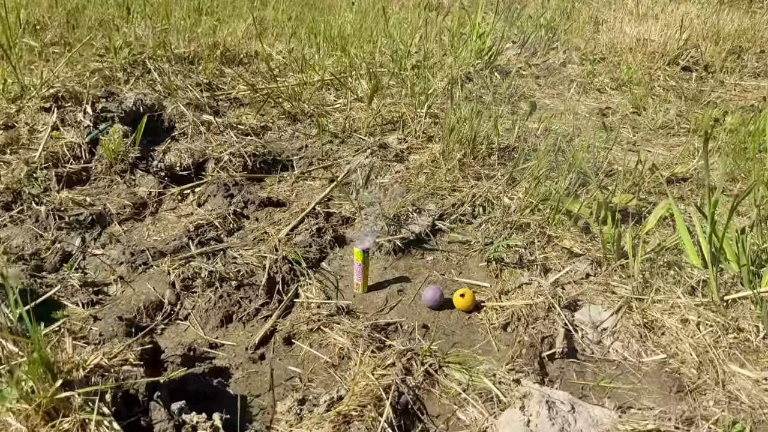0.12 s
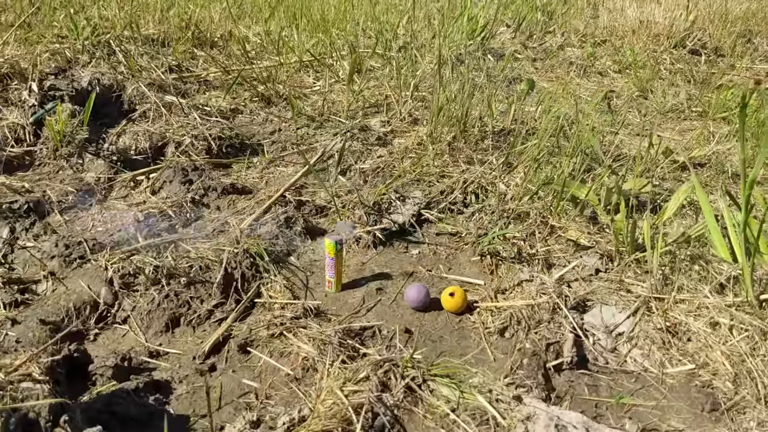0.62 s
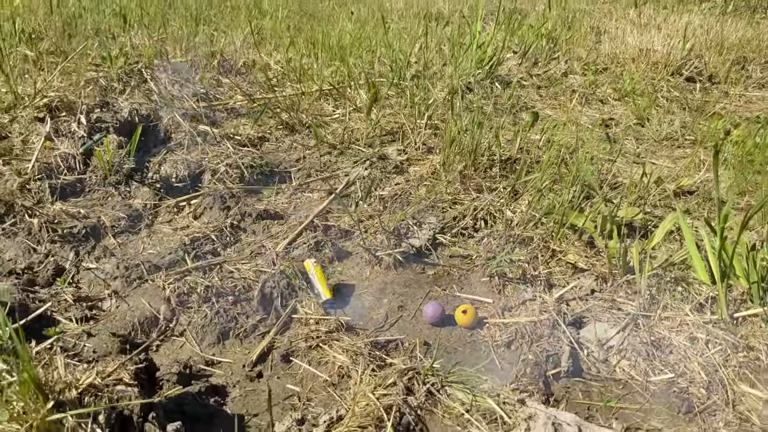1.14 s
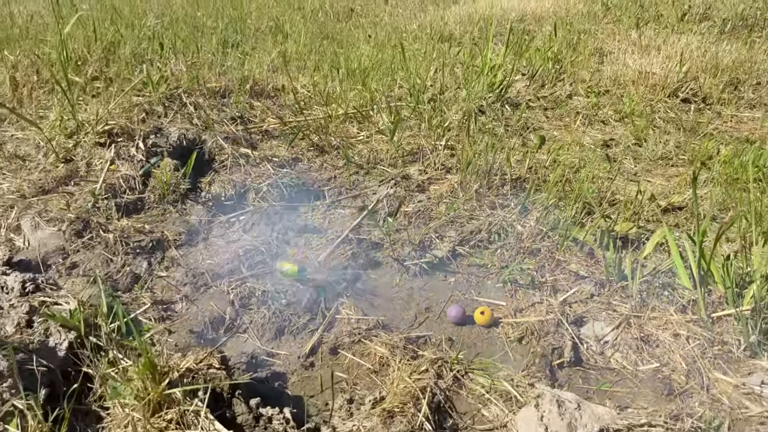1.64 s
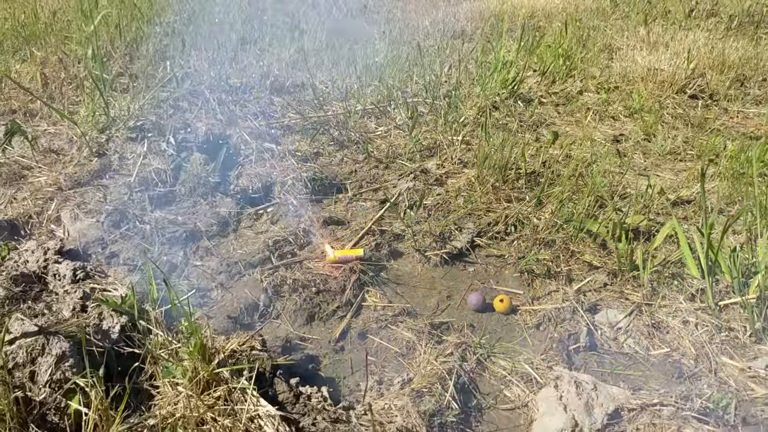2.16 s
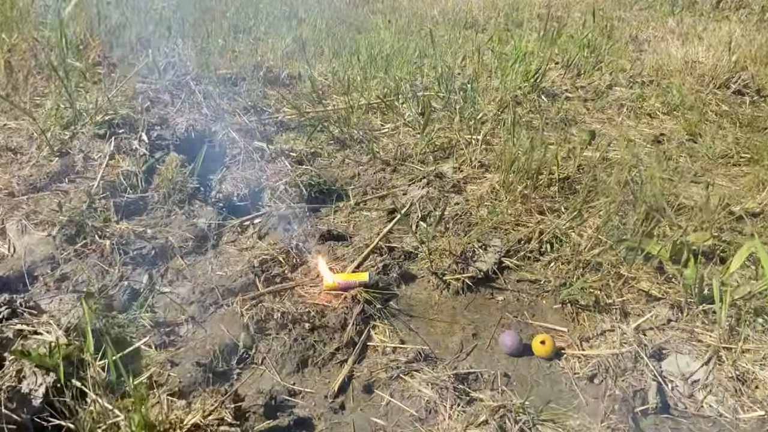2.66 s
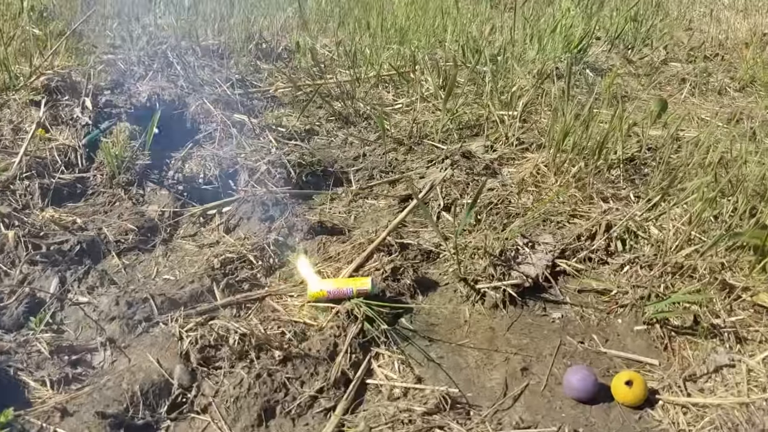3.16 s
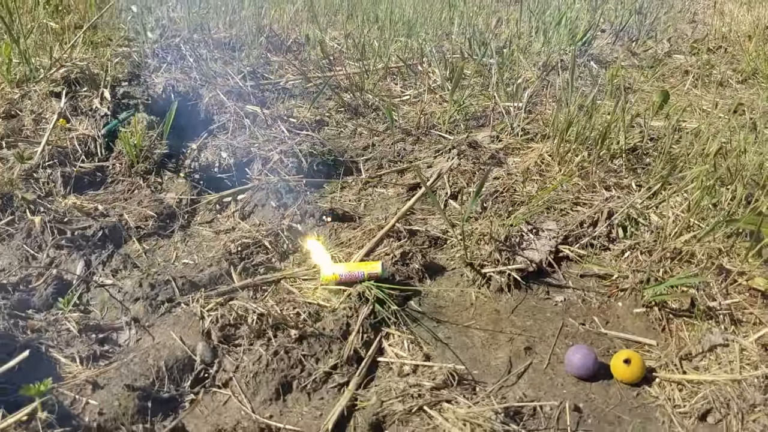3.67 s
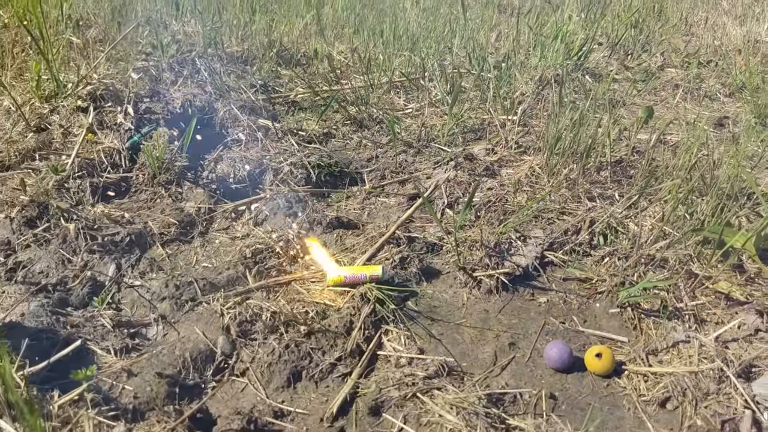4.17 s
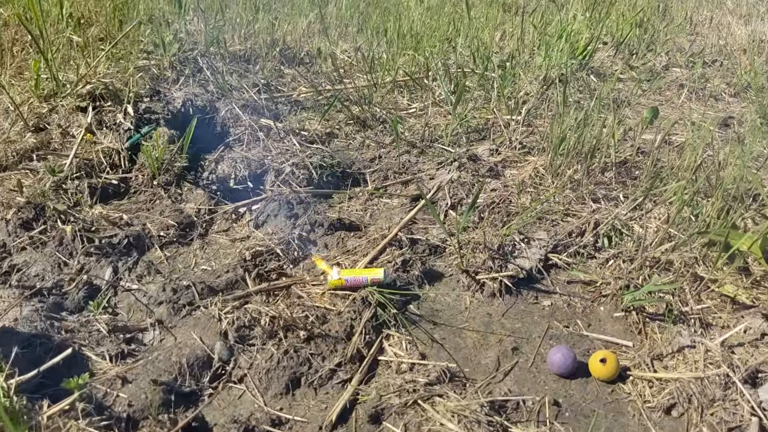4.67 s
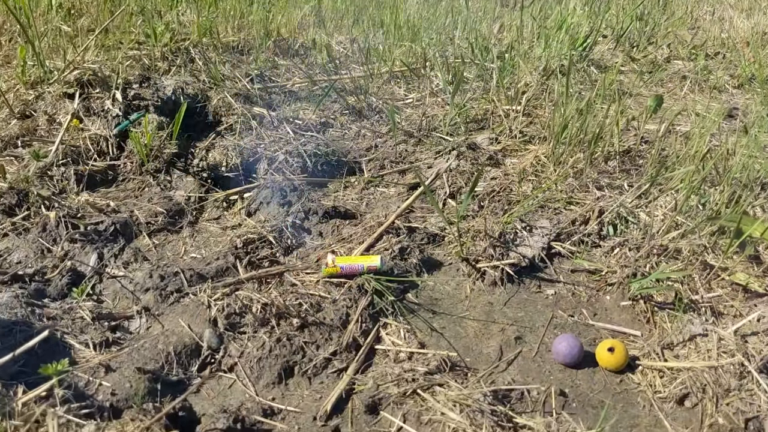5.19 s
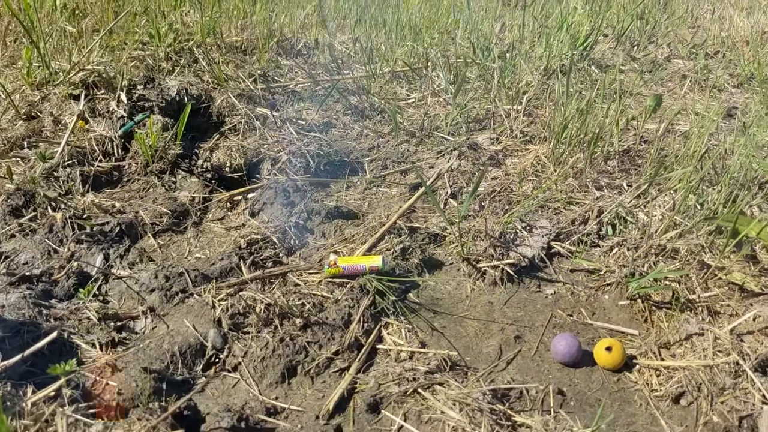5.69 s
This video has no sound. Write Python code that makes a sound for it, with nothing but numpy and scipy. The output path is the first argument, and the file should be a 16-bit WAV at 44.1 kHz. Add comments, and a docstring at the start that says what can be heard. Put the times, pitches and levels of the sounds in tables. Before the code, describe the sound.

Faint birds, then a sudden whirring jet of sparks that settles into a harsh bright hiss, pops sharply and coughs away in an open field.

```python
"""A small paper-tube firework spins on bare soil in a field, then lies still, hisses, pops and sputters out.
Its jet is banded noise with swinging colour; its pops and ticks are clicks ringing the short tube.
Two far birds and one short whistle are wavering near-sines blurred by echoes, over a faint rustle of
grass and air in shaped noise. Wind, as low breeze noise and lumpy gusts, buffets the two microphone
ports of a hand-held camera."""
import sys
import numpy as np
from scipy import signal
from scipy.io import wavfile
from scipy.ndimage import uniform_filter1d, map_coordinates

SR = 44100
rng = np.random.default_rng(int(sys.argv[2]) if len(sys.argv) > 2 else 0)


def amplitude_ratio(level_db):
    """Convert a level in decibels to the matching linear amplitude (field) ratio."""
    exponent = np.asarray(level_db, float) / 20
    return 10 ** exponent


def int16_out(signal):
    """Quantize to a 16-bit WAV file."""
    q = np.round(np.clip(np.atleast_2d(signal).T, -1, 1) * 32767)
    wavfile.write(sys.argv[1], SR, q.astype(np.int16))


N = 256567   # samples


def rms_one(x):
    """Scales a signal to an rms of 1."""
    return x / np.sqrt(np.mean(x ** 2) + 1e-20)


def in_time(rows):
    """Draws each column of a table as a curve over the scene; the first column is seconds."""
    s, *columns = np.transpose(rows)
    return [np.interp(np.arange(N) / SR, s, c) for c in columns]


def fade_in(from_to_s):
    """Straight rise from 0 to 1 between two moments."""
    return np.interp(np.arange(N) / SR, from_to_s, [0, 1])


def at_hz(points, hz):
    """Reads a spectrum table at one frequency, along a log frequency axis."""
    table_hz, db = np.transpose(points)
    return np.interp(np.log(hz), np.log(table_hz), db)


def drift(rate_hz):
    """Slow chance of spread 1: sparse noise twice through a one-pole low-pass."""
    step = 40   # samples between draws
    r = np.exp(-2 * np.pi * step * rate_hz / SR)
    draws = rng.standard_normal(N // step + 2002)
    slow = signal.lfilter([1], [1, -2 * r, r * r], draws)[2000:]
    return np.interp(np.arange(N) / step, np.arange(len(slow)), rms_one(slow))


def bumps(rows, width_s):
    """Each row is a brief bell-shaped swell or dip, width_s its standard deviation; one curve per column."""
    s, *columns = np.transpose(rows)
    coarse = np.arange(0, N, 32)
    shape = np.exp(-.5 * ((coarse[:, None] / SR - s) / width_s) ** 2)
    return np.array([np.interp(np.arange(N), coarse, shape @ c) for c in columns])


def band_pass(x, low_hz, high_hz):
    """Second-order Butterworth band-pass."""
    return signal.sosfilt(signal.butter(2, [low_hz, high_hz], "band", fs=SR, output="sos"), x)


def bands(white):
    """Splits noise into third-octave bands; neighbours come from unrelated noise."""
    edges = np.minimum(90 * 2 ** np.arange(0, 8, 1 / 3), 19000)
    for k, (low, high) in enumerate(zip(edges, edges[1:])):
        yield np.sqrt(low * high), band_pass(white[k % 2], low, high)


def resonances(x, peaks):
    """A chain of peaking filters, each lifting or cutting around one frequency."""
    for hz, width_hz, db in peaks:
        w, g, a = 2 * np.pi * hz / SR, amplitude_ratio(db / 2), np.pi * width_hz / SR
        turn = -2 * np.cos(w)
        x = signal.lfilter([1 + a * g, turn, 1 - a * g], [1 + a / g, turn, 1 - a / g], x)
    return x


def late(x, lag_ms):
    """Delays a signal by a lag that may move, reading between samples."""
    return map_coordinates(x, [np.arange(N) - lag_ms * SR / 1000], order=3, mode="nearest")


def pan(db):
    """Left and right gains for a left-right difference in dB; positive is louder on the left."""
    return amplitude_ratio(np.reshape([db / 2, -db / 2], (2, -1)))


# Colour of the far rustle. Each row: frequency in Hz, relative level in dB per Hz.
FIELD_COLOUR = [(150, -40), (250, -10), (1460, -11), (2240, -5.5), (3390, -10), (3960, 1), (5040, -17),
                (7250, -7.5), (10100, -13.5), (12800, -13), (15500, -18)]


def field():
    """Far rustle of grass and air: shaped noise, all but unrelated between the ports."""
    white = rng.standard_normal((2, 2, N))
    white = white + 0.02 * white[:, ::-1]
    rustle = sum(amplitude_ratio(at_hz(FIELD_COLOUR, hz)) * band for hz, band in bands(white))
    return amplitude_ratio(-53) * rms_one(rustle)


# Steady breeze on the ports. Each row: time in seconds, left and right level of its lowest band in dB.
BREEZE_LEVELS = [(0, -57, -56), (.45, -54.5, -57), (.65, -49, -47), (1.0, -48.5, -53), (1.4, -38, -43),
                 (2.25, -47, -52), (2.6, -34, -36), (2.9, -39, -38.5), (3.25, -52.5, -58),
                 (4.2, -46.5, -47.5), (5.3, -36.5, -44), (5.82, -38, -39.5)]
# Strong gusts. Each row: time in seconds, low-band level in dB at the port hit harder,
# length in seconds (standard deviation of the bell), left-right difference in dB.
GUST_HITS = [(1.089, -27.5, 0.0078, 31), (1.19, -33, 0.025, 27), (1.796, -33.5, 0.019, 4),
             (2.573, -34, 0.012, 7), (2.666, -32, 0.03, 3), (2.96, -32, 0.033, 23),
             (4.44, -28.5, 0.0093, 4.5), (4.729, -21, 0.045, 25), (4.897, -28, 0.0047, 20),
             (5.23, -26, 0.0075, 27), (5.265, -26, 0.004, 32), (5.278, -29.5, 0.0066, 28),
             (5.44, -35, 0.016, -5), ]


def wind():
    """Pressure on the ports, own in each: a low breeze, and lumpy gusts that also reach a higher band."""
    s, gust_db, length_s, side_db = np.transpose(GUST_HITS)
    # harder gusts reach higher: dB of upper band gained per dB above a -30 dB gust
    upper_db = -5 + 0.14 * (gust_db + 30)
    at_ports = amplitude_ratio(gust_db + np.minimum([side_db, -side_db], 0))
    white = rng.standard_normal((2, N))
    lumpy = white * amplitude_ratio([4.1 * drift(29.0), 2.0 * drift(29.0)])

    steady = rms_one(band_pass(white, 72, 232))
    unsteady = amplitude_ratio(-8.5) * rms_one(band_pass(lumpy, 114, 494))
    breeze = amplitude_ratio(np.array(in_time(BREEZE_LEVELS))) * (steady + unsteady) * amplitude_ratio(1.0 * drift(20.0))
    low = bumps(np.c_[s, at_ports.T], length_s) * rms_one(band_pass(lumpy, 109, 330))
    high = bumps(np.c_[s, (at_ports * amplitude_ratio(upper_db)).T], length_s) * rms_one(band_pass(lumpy, 230, 640))
    return breeze + low + high * amplitude_ratio(5.0 * drift(43.0))


def wavering_tone(rows, wobble, flutter_db, overtones, side_db, echo_db, echo_t60):
    """A wavering near-sine with partials (multiple, dB), blurred by dense decaying echoes."""
    (first_s, first_hz, _), (last_s, last_hz, _) = rows[0], rows[-1]
    hz, level_db = in_time([(first_s - .02, first_hz, -90), *rows, (last_s + .02, last_hz, -90)])
    phase = 2 * np.pi * np.cumsum(hz * (1 + wobble * drift(75.0))) / SR
    tone = np.sin(phase) + sum(amplitude_ratio(db) * np.sin(k * phase) for k, db in overtones)
    tone = np.sqrt(2) * tone * amplitude_ratio(level_db + flutter_db * drift(45.0))
    t = np.arange(SR // 2) / SR
    echoes = rng.standard_normal((2, len(t))) * amplitude_ratio(-60 * t / echo_t60)
    echoes = amplitude_ratio(echo_db) * echoes / np.sqrt(np.sum(echoes ** 2, axis=1, keepdims=True))
    return pan(side_db) * (tone + signal.fftconvolve(tone[None], echoes, axes=1)[:, :N])


# Pitch path of a far call. Each row: time in seconds, frequency in Hz, tone level in dB before panning.
FALLING_CALL = [(0, 4100, -42.5), (.09, 4075, -62), (.14, 4130, -50), (.21, 4030, -50), (.28, 3870, -52),
                (.34, 3750, -58), (.45, 3740, -64), (.54, 3780, -61)]


def falling_bird():
    """Far call that sinks in pitch, a bare tone with a long echo from the trees, on the right."""
    return wavering_tone(FALLING_CALL, wobble=0.008, flutter_db=3.0, overtones=[], side_db=-13.5,
                         echo_db=3.0, echo_t60=1.1)


# Pitch path of a higher call. Each row: time in seconds, frequency in Hz, tone level in dB before panning.
RISING_CALL = [(.34, 4600, -67), (.45, 4760, -63), (.52, 4600, -68), (.56, 4560, -58), (.59, 4650, -53),
               (.63, 4690, -54), (.66, 4700, -60), (.71, 4750, -53), (.77, 4740, -54), (.805, 4640, -60),
               (.835, 4530, -60)]


def rising_bird():
    """Far higher call with faint partials at half and one and a half times its pitch, echoed by the trees."""
    return wavering_tone(RISING_CALL, wobble=0.0077, flutter_db=4.0, overtones=[(.5, -22), (1.5, -28)],
                         side_db=-6.0, echo_db=5.5, echo_t60=0.3)


# Gas flow through the nozzle. Each row: time in seconds, relative jet level in dB.
GAS_FLOW = [(.765, -81), (.78, -49), (.835, -48.5), (.85, -37), (.93, -33), (1.0, -30), (1.08, -24),
            (1.3, -23), (1.6, -23.5), (1.84, -26.5), (2.04, -20.5), (2.26, -22.5), (2.79, -20),
            (2.85, -22.5), (2.92, -22.5), (3.2, -20.5), (3.31, -21.5), (3.41, -17.5), (3.55, -20.5),
            (4.03, -20), (4.2, -21), (4.33, -21.5), (4.5, -23), (4.74, -22), (4.8, -26), (4.812, -29.5),
            (4.86, -31), (5.1, -28), (5.6, -32), (5.82, -33.5)]
# Centres of the four colour parts in Hz: rumble, roar, hiss, sizzle.
PART_CENTRES_HZ = (600, 2300, 4500, 14000)
# Jet at the nozzle. Each row: frequency in Hz, relative level in dB per Hz.
JET_SPECTRUM = [(120, -24.5), (300, -10), (700, -2.5), (1300, -1.5), (2000, 0.5), (2700, 0.5), (3500, -6),
                (4500, -3.5), (6000, -1), (7500, 0), (9000, 1), (11000, 2), (13000, 2), (15500, 3)]
# Colour of the jet. Each row: time in seconds, then lift of rumble, roar, hiss and sizzle in dB.
JET_COLOUR = [(.78, 4, -4, 5, -4), (1.0, 2.5, -9, -1, 2.5), (1.2, -2.5, 3.5, -0.5, -9.5),
              (1.35, 5.5, 6, 6.5, 4), (1.45, 4.5, 2, 4, -0.5), (1.56, 6, 2, 0, 0), (1.65, 1.5, -3, 0.5, -2),
              (1.8, 0.5, -5.5, -2, -2), (2.05, -3.5, -5, 0, 4), (2.3, 1, -3, 6, -2.5),
              (2.55, -1.5, -0.5, 7.5, 2), (2.7, -6.5, 3, 13, 6.5), (3.0, -4, 5, 13, 6.5),
              (3.3, -1.5, -1, 4, -3.5), (3.75, 0.5, 1, 7, 0), (4.2, 3.5, 2.5, 10.5, 3),
              (4.8, 8.5, 4, 10.5, 0), (4.84, 11.5, 1.5, 13, -2), (4.93, 11, -1, 8.5, 0),
              (5.0, 2, -2, 6, -1.5), (5.31, -3, -6.5, 0, -4), (5.82, -3.5, -11.5, 1.5, -3)]
# Where the jet stands. Each row: time in seconds, left-right dB, left-right dB of the sizzle.
JET_PLACE = [(1.0, 0.5, -2), (1.2, -4.5, -3.5), (2.05, -2, -8.5), (2.4, 0, -0.5), (3.4, -3, -3.5),
             (4.45, -0.5, -0.5), (4.76, -1, -2), (5.0, 1, -1), (5.82, -1, -0.5)]
# Sound of its own at each port. Each row: frequency in Hz, level in dB against the common stream.
SCATTER = [(300, -10.5), (1000, -8.5), (3000, -4.5), (7000, -2), (15000, -2)]
# Treble bands shaped as the nozzle burns wider. Each row: frequency in Hz, width in Hz, lift in dB.
WIDE_NOZZLE = [(6470, 320, -3.5), (7700, 1100, 0.5), (10900, 1700, -1.5), (12650, 800, 3), (13200, 900, -6)]
# Start and end of that wear in seconds.
NOZZLE_WEARS_S = (1.9, 5.1)


def jet():
    """Turbulent gas: one common stream plus sound scattered differently to each port."""
    flow_db, = in_time(GAS_FLOW)
    parts_db, (side_db, sizzle_side_db) = in_time(JET_COLOUR), in_time(JET_PLACE)
    sweep_db, roar_sweep_db = swings()
    flow_db = flow_db + 0.44 * drift(94.0)
    # eddies and burning grains make the stream slightly spiky
    white = rng.standard_normal((2, 3, N)) * amplitude_ratio(1.8 * rng.standard_normal(N))
    flicker_db = 1.02 * drift(12.0)   # the flame at the nozzle wavers and the lower parts with it
    # hiss and sizzle both fade out towards 8 kHz, where no part colours the jet
    log_centres = np.log(np.insert(PART_CENTRES_HZ, 3, 8000))
    part_shapes = np.eye(5)[[0, 1, 2, 4]]
    common, own = np.zeros((2, N)), np.zeros((2, N))
    for hz, (stream, *scattered) in bands(white):
        nearness = [np.interp(np.log(hz), log_centres, shape) for shape in part_shapes]
        colour_db = sum(n * part for n, part in zip(nearness, parts_db))
        if hz < 4000:
            swing_db = roar_sweep_db + flicker_db
        else:
            swing_db = sweep_db * (1 if hz > 10000 else 0.64)   # the hiss swings less than the top
        side = pan(sizzle_side_db if hz > 11000 else side_db * min(hz / 4000, 1))
        level_db = at_hz(JET_SPECTRUM, hz) + colour_db + swing_db + flow_db + 0.71 * drift(7.0) + 2.5
        gain = side * amplitude_ratio(level_db)
        common += gain * stream
        own += gain * amplitude_ratio(at_hz(SCATTER, hz)) * scattered
    worn = fade_in(NOZZLE_WEARS_S)
    return [x + worn * (resonances(x, WIDE_NOZZLE) - x) for x in (common, own)]


# Depth of a sweep as the tube spins. Each row: time in seconds, usual treble swell and roar swell in dB.
SPIN_DEPTH = [(1.002, 2.5, 3.5), (1.2, 4.5, 3), (1.34, 6.5, 7)]
# Single strong sweeps of the fast spin. Each row: time in seconds, treble swell and roar swell in dB.
SPIN_SWEEPS = [(1.362, 4.5, 0), (1.388, 7, 8), (1.406, 6.5, 9), (1.426, 6, 6.5), (1.447, 3, 3),
               (1.474, 6.5, 1), (1.486, 2, 6.5), (1.526, 1, 11), (1.547, 8, 8), (1.566, 8.5, 9.5),
               (1.583, 8, 8), (1.608, 7, 10.5), (1.628, 8, 10), (1.645, 6, 5), (1.676, 5, 6.5),
               (1.71, 9.5, 7), (1.727, 7.5, 10.5), (1.76, 6, 1)]
# The jet spits or falters. Each row: time in seconds, treble dB, roar dB,
# length in seconds (standard deviation of the bell).
JET_SPITS = [(1.117, 7.5, -3.5, .008), (1.198, 7.5, 1.5, 0.014), (1.245, 3.5, -0.5, 0.021),
             (1.463, -7.5, -9, 0.006), (1.87, 7.5, 3.5, 0.0099), (1.883, 3.5, 4, 0.0079),
             (1.896, 5.5, 7, 0.0044), (4.881, 3, 3, .004), (4.934, -2, 7.5, 0.0044),
             (4.963, -1, -5.5, 0.014), (5.073, 1.5, 7, 0.005), (5.188, -1.5, -3.5, 0.017),
             (5.296, 1, -3, 0.0086), (5.326, 1, -8, 0.016), (5.4, 2, 4, 0.015), (5.438, 2, 9.5, 0.0076),
             (5.468, -5, 3, 0.0036), (5.514, -4, -4, 0.0033), (5.552, -5, 11, 0.0056),
             (5.578, 4.5, 6, 0.0051), (5.587, -10, 5.5, 0.01), (5.639, 2, 11, .004), (5.68, 4, 0.5, 0.027),
             (5.716, 7, 9.5, 0.0038)]


def swings():
    """Treble and roar swell as each turn swings the jet past, at each spit and at random dying coughs."""
    turns_per_s, facing_s = 39, 1.548   # turn rate, and the moment of facing that turns are counted from
    uneven_turn, uneven_sweep = .09, .3   # approximate spreads: share of a turn, share of the depth
    turns = np.arange(-28, -9)
    luck = np.sqrt(3) * rng.uniform(-0.93, 1, (len(turns), 3))
    s = facing_s + (turns + uneven_turn * luck[:, 0]) / turns_per_s
    at, *depth_db = np.transpose(SPIN_DEPTH)
    sweeps = [np.interp(s, at, d) * (1 + uneven_sweep * luck[:, k + 1]) for k, d in enumerate(depth_db)]
    early = bumps(np.c_[s, np.transpose(sweeps)], width_s=0.0022)
    strong = bumps(SPIN_SWEEPS, width_s=0.0026)

    dying_s, coughs_per_s = 5.3, 52
    gap, treble, roar = rng.exponential(1, (60, 3)).T
    cough_s = dying_s + np.cumsum(gap) / coughs_per_s
    # treble dips by chance; roar either dips or swells, in dB
    coughs = bumps(np.c_[cough_s, -3 * treble, 2 * np.minimum(roar, 1.6) - 1.3], width_s=0.0046)
    spits = np.array(JET_SPITS)
    return early + strong + coughs + bumps(spits[:, :3], spits[:, 3])


# Powder grains bursting in the mouth of the tube. Each row: time in seconds, strike in dB, left-right dB.
GRAIN_BURSTS = [(1.031, -25, 0), (1.069, -22, 0), (4.1847, -4.5, -3), (4.4408, -9.5, -1), (4.685, -17, 8),
                (4.8153, -8, 5), (5.021, -20, -5), (5.071, -22, 0), (5.092, -22, .5), (5.106, -22, 0),
                (5.512, -25, 0), (5.538, -24, -7)]
# Ringing of the short tube. Each row: frequency in Hz, level in dB, decay to -60 dB in seconds.
TUBE_MODES = [(1400, -9, .007), (1950, -1.5, .012), (2750, -3, .008)]
# Small grains, harder in the spin and as the jet dies. Each row: time in seconds,
# base strike in dB against the gas flow.
GRAIN_SPUTTER = [(1.0, -5.5), (1.7, -6), (2.0, -11), (4.8, -8), (5.0, -11), (5.82, -7.5)]


def pops():
    """Bursts briefly ring the short tube; small ones tick at random, each with its own colour."""
    s, burst_db, side_db = np.transpose(GRAIN_BURSTS)
    flow_db, = in_time(GAS_FLOW)
    sputter_db, = in_time(GRAIN_SPUTTER)
    ticks_per_s = 160
    strike_db = flow_db + sputter_db + 3.5 * np.minimum(rng.exponential(1, N), 3)
    ticks = amplitude_ratio(strike_db) * (rng.random(N) < ticks_per_s / SR)
    bursts, out = np.zeros((2, N)), 0
    bursts[:, (s * SR).astype(int)] = -amplitude_ratio(burst_db) * pan(side_db)
    for hz, level_db, t60 in TUBE_MODES:
        r, w = amplitude_ratio(-60 / (t60 * SR)), 2 * np.pi * hz / SR
        clicks = bursts + ticks * rng.standard_normal(N)
        ring = signal.lfilter([0, np.sin(w)], [1, -2 * r * np.cos(w), r * r], clicks + 1e-18)
        out = out + amplitude_ratio(level_db) * ring
    return band_pass(out, 700, 4500)


# Paths from tube to ports. Each row: time in seconds, lag of the right port in ms,
# housing echo left and right in ms, ground echo left and right in ms.
PORT_PATHS = [(2.0, 0.071, 0.11, 0.059, 0.29, 0.3), (3.2, 0.092, 0.15, 0.15, 0.524, 0.406),
              (5.1, 0.092, 0.13, 0.14, 0.47, 0.397)]
# Housing echo level in dB: left, right.
HOUSING_ECHO_DB = (-16.5, -16)
# Ground echo level in dB: left, right.
GROUND_ECHO_DB = (-23, -14.5)
# Ripple of the rough soil beside the still tube. Each row: frequency in Hz, width in Hz, lift in dB.
SOIL_RIPPLE = [(1320, 240, 4), (1720, 380, -0.5), (2455, 400, -5), (3450, 820, 6.5), (4460, 410, -7.5)]
# Start and end of the tube's settling in seconds.
TUBE_SETTLES_S = (1.6, 1.8)


def ports(common, own):
    """The left port hears first; housing and ground echoes ripple the spectrum, and soil the right port."""
    right_ms, *echo_ms = in_time(PORT_PATHS)
    right = late(common[1], right_ms) + own[1]
    right = right + fade_in(TUBE_SETTLES_S) * (resonances(right, SOIL_RIPPLE) - right)
    heard = []
    for k, x in enumerate([common[0] + own[0], right]):
        housing = amplitude_ratio(HOUSING_ECHO_DB[k]) * late(x, echo_ms[k])
        ground = amplitude_ratio(GROUND_ECHO_DB[k]) * late(x, echo_ms[k + 2])
        heard.append(x + housing + ground)
    return np.array(heard)


# Pitch path of a short whistle. Each row: time in seconds, frequency in Hz, tone level in dB before panning.
WHISTLE_PITCH = [(2.70, 4150, -34), (2.725, 4160, -24), (2.765, 4050, -19.5), (2.8, 3990, -26),
                 (2.865, 3880, -29), (2.888, 4130, -23), (2.903, 4350, -29), (2.915, 4700, -33)]


def whistle():
    """One short clear whistle on the right: a bare tone that sinks, then turns upward, with a short echo."""
    return wavering_tone(WHISTLE_PITCH, wobble=0.00403, flutter_db=0.7, overtones=[], side_db=-14.0,
                         echo_db=-3.0, echo_t60=0.053)


def scene():
    """Firework through its paths to the ports, with field, wind, birds and whistle added there."""
    common, own = jet()
    firework = ports(common + pops(), own)
    return field() + wind() + falling_bird() + rising_bird() + firework + whistle()


def band_limit(x):
    """A steep low-pass at the top of the band."""
    return signal.sosfilt(signal.butter(12, 17070, fs=SR, output="sos"), x)


# Cavities in front of the left and the right capsule, one list each.
# Each row: frequency in Hz, width in Hz, lift in dB.
CAPSULE_CAVITIES = ([(2530, 250, 4), (3870, 380, 3), (5180, 200, -7), (6670, 1250, 3.5),
                    (10500, 1100, -4.5), (15400, 3900, 7.5)], [(2560, 660, 2.5), (3870, 870, -5),
                    (5560, 230, 2.5), (7900, 1400, 3), (11670, 260, 4.5), (13500, 480, -4)])


def record(dry):
    """Capsule cavities colour the sound; a limiter ducks just ahead of peaks and recovers; the top is cut."""
    x = np.array([resonances(port, peaks) for port, peaks in zip(dry, CAPSULE_CAVITIES)])
    top_db, recover_db_per_s, ahead = -.3, 30.0, round(.002 * SR)   # ahead: smoothing span in samples
    ramp = recover_db_per_s * np.arange(N) / SR
    over_db = np.maximum(20 * np.log10(np.abs(x).max(axis=0) + 1e-9) - top_db, 0)
    held_db = np.maximum.accumulate(over_db + ramp) - ramp
    held_db = uniform_filter1d(np.roll(held_db, -ahead // 2), ahead)
    low_pass = signal.ellip(10, .5, 58, 15690, fs=SR, output="sos")
    x = signal.sosfilt(low_pass, x * amplitude_ratio(-held_db))
    return band_limit(np.clip(x, -1, 1))


dry = scene()
out = record(dry)
int16_out(out)
```